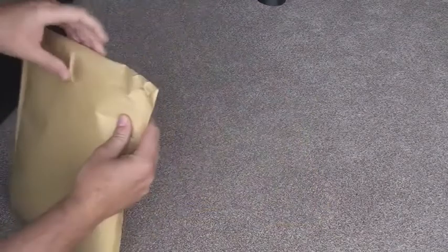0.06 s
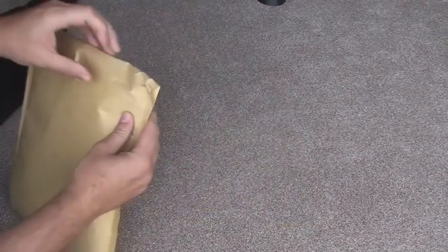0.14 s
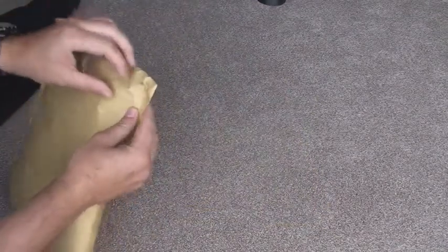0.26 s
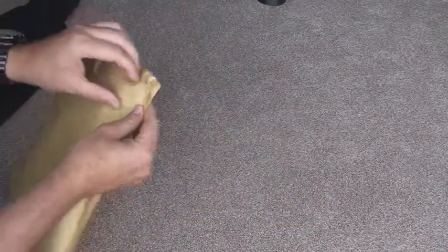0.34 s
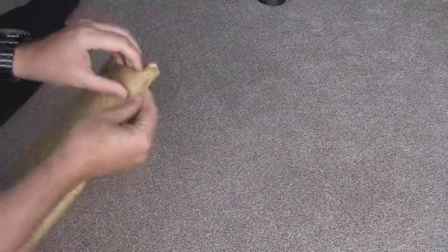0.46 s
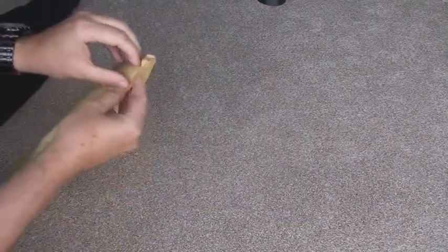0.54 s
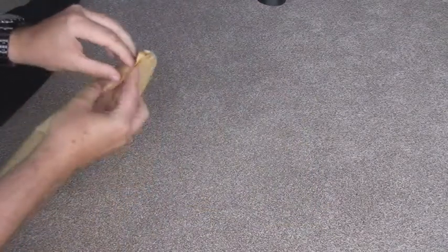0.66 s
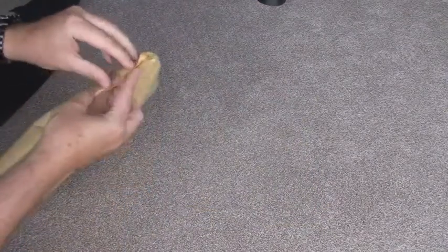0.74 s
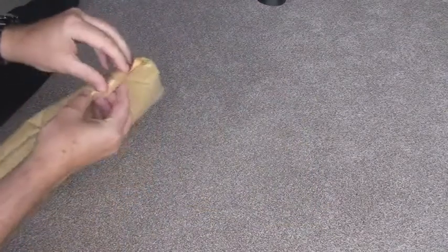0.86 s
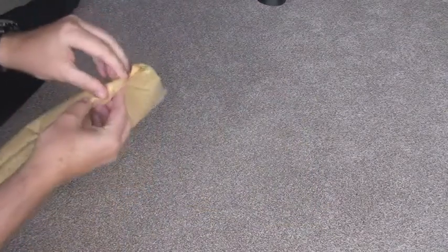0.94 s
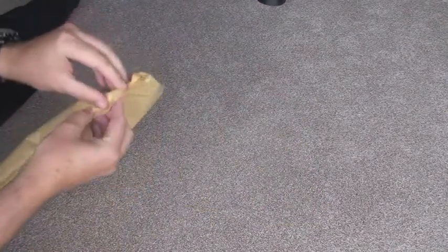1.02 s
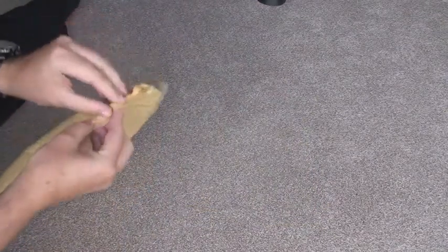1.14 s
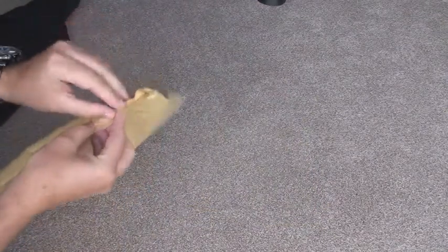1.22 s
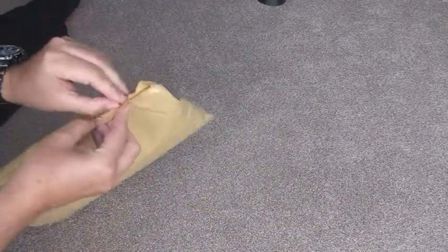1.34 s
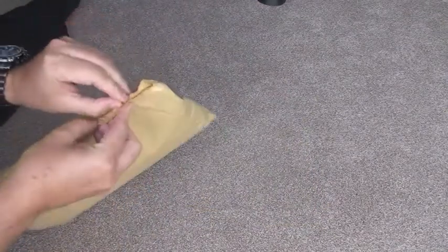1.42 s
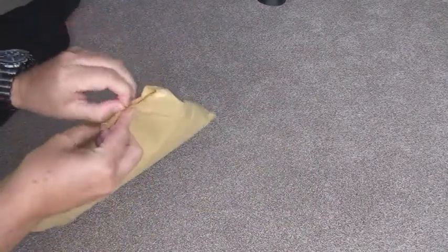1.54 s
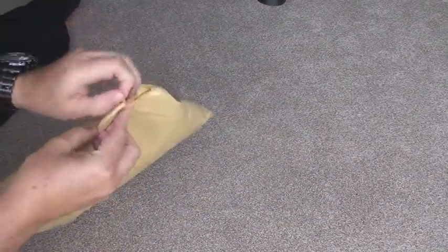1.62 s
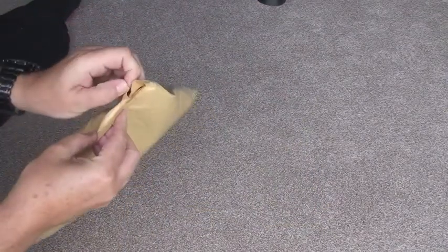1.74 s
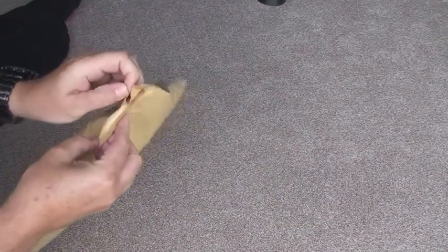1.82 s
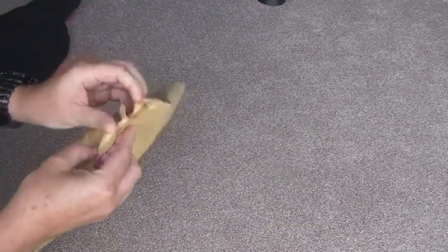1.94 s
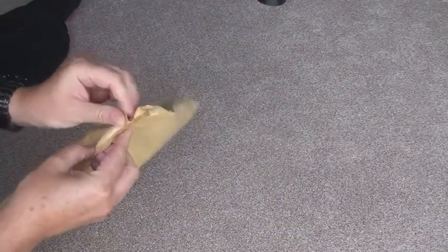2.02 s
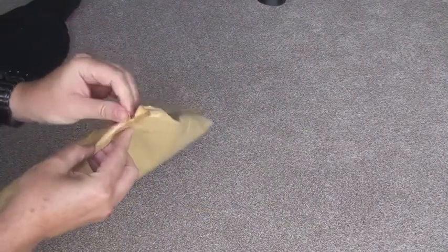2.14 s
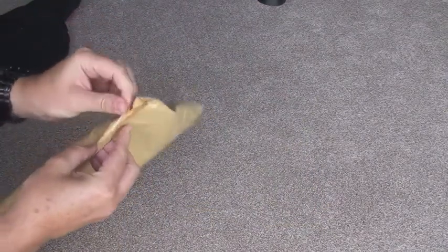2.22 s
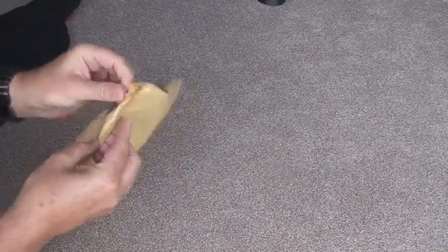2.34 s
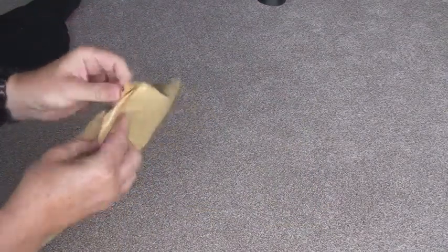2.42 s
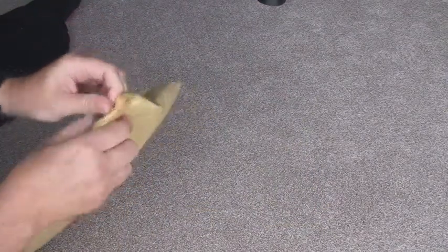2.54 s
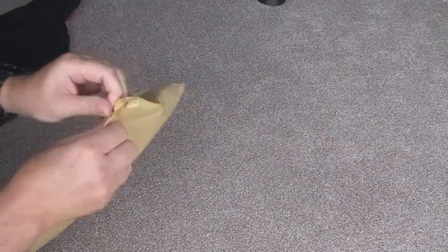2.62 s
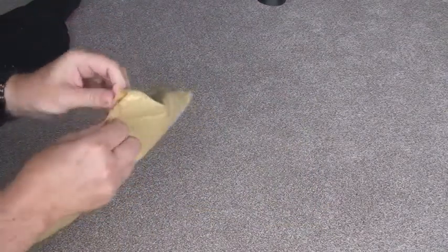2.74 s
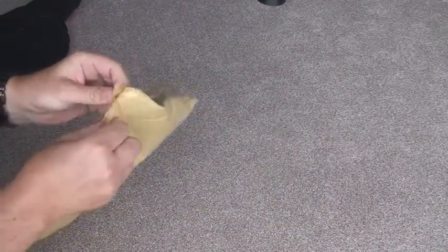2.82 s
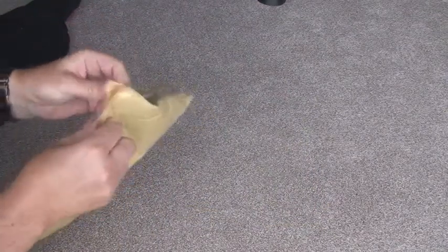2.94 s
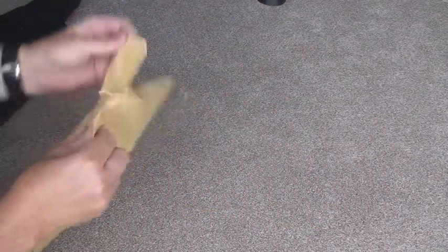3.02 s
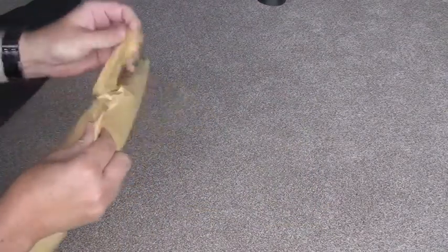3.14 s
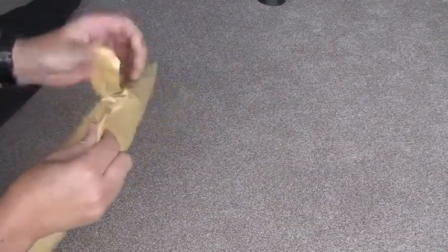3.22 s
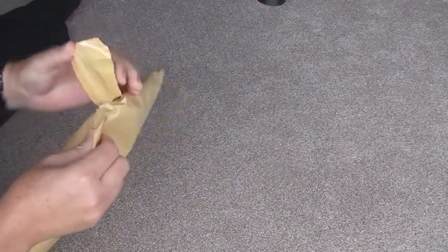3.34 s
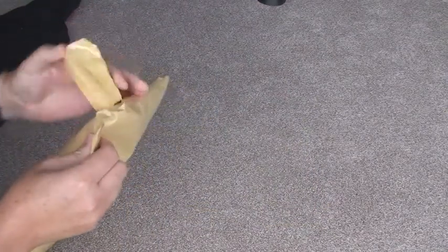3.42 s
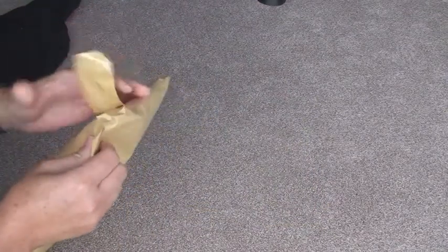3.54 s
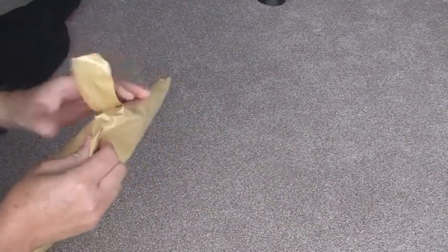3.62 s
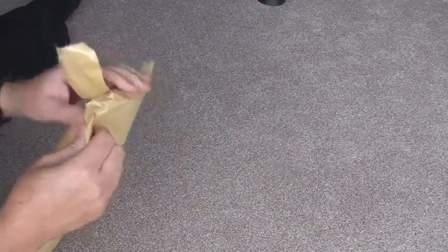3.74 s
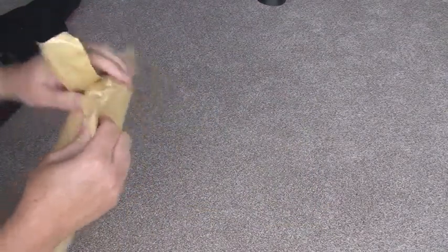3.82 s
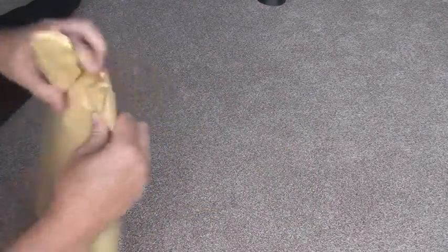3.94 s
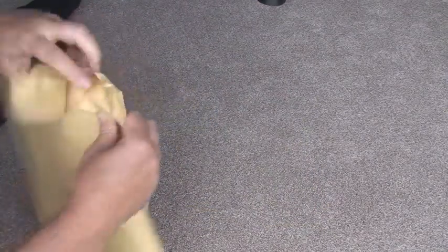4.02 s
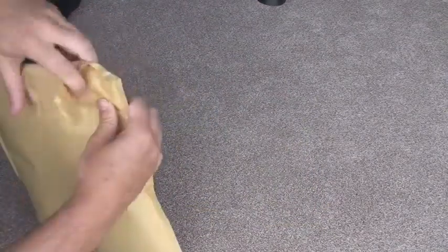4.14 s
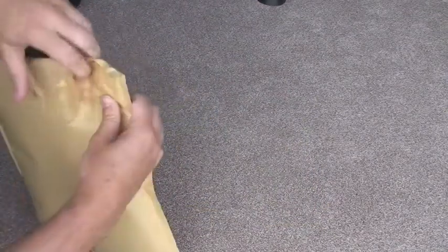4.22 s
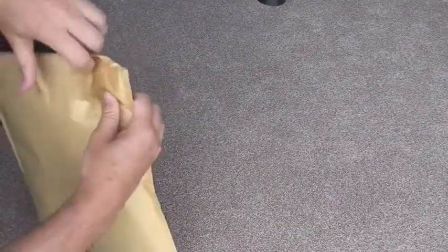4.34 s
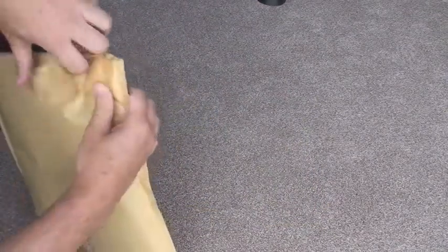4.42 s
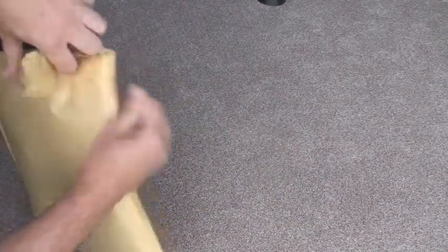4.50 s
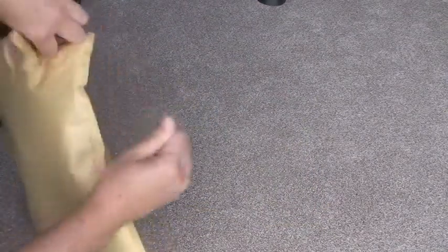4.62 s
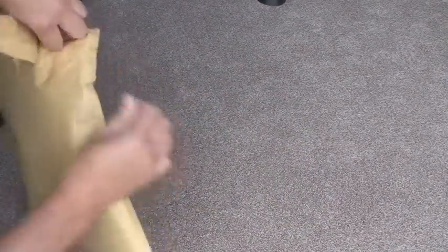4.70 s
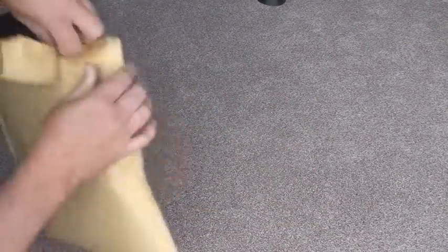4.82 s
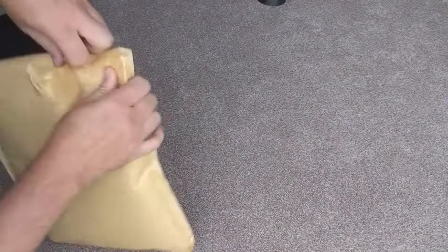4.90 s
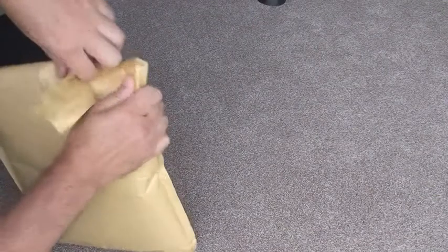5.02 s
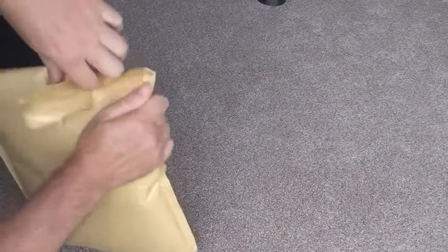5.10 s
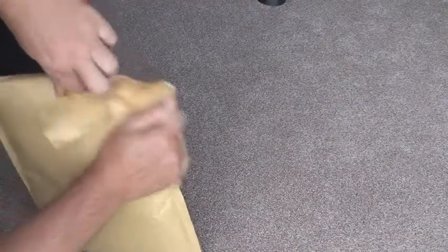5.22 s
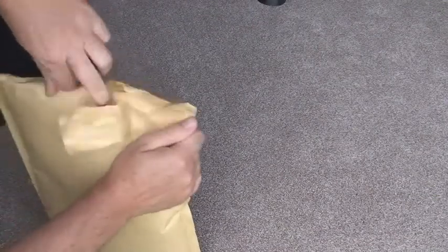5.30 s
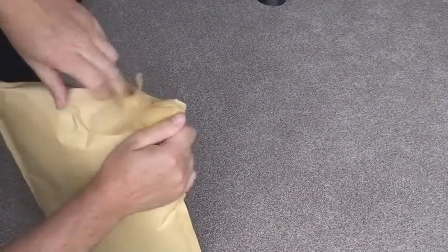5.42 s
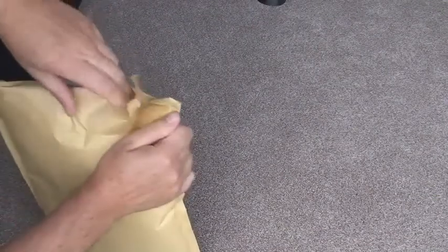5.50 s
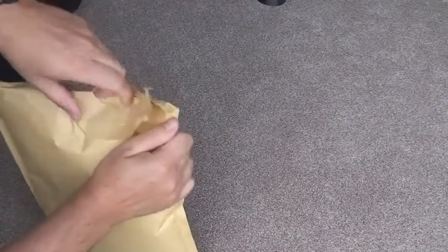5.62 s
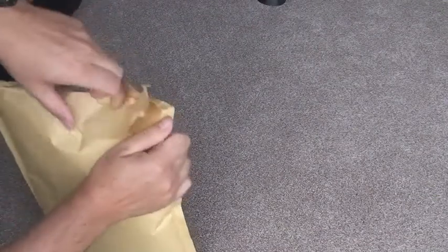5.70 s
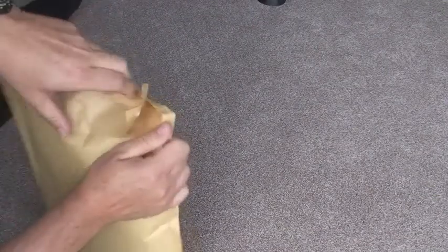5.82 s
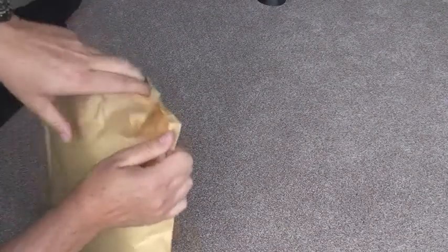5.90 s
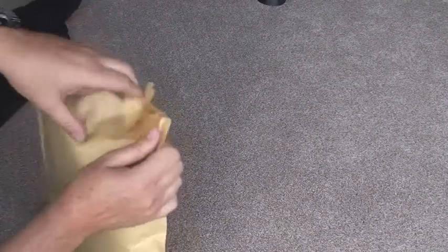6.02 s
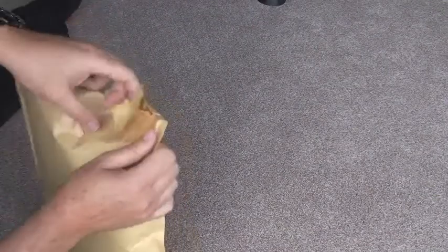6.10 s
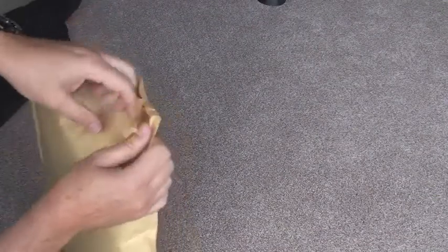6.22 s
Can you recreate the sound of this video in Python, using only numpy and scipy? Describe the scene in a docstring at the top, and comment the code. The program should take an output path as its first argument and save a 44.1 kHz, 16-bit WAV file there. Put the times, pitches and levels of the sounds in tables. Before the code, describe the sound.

Fingers rub and pinch a stiff padded paper envelope, with uneven crinkles and crisp little snaps. It grows quieter and sparser, then a fast bright rip at three seconds and a slower, fitful tear follow. Soft thuds and a hollow pop lead into louder crumpling. Close pickup, nearly mono, slightly left, in a small carpeted room with faint room tone.

```python
"""Tearing open a padded envelope

Two hands pick at the flap of a padded paper envelope, rip a strip off in two pulls and bend the mouth open.
Creases are noise bursts rung through four bands; rubbing and tearing are dense noise grains with set spectra.
Thuds and the hollow bag are damped sines; squeaks and the taut strip are resonated noise.
A small carpeted room answers with decaying noise; the near pickup is almost mono, over a faint room tone."""
import sys
import numpy as np
from scipy import signal
from scipy.fft import rfft, irfft, next_fast_len
from scipy.io import wavfile
from scipy.ndimage import map_coordinates

SR = 44100
rng = np.random.default_rng(int(sys.argv[2]) if len(sys.argv) > 2 else 0)


def file_out(sig):
    """Save sig as 16-bit WAV at sys.argv[1]."""
    # one column per channel
    cols = np.atleast_2d(sig).T
    # limit, then scale
    lim = np.clip(cols, -1, 1)
    pcm = np.round(lim * 32767).astype(np.int16)
    wavfile.write(sys.argv[1], SR, pcm)


N = 276227


def amp(db):
    """Decibels to gain."""
    return 10 ** (np.asarray(db) / 20)


def unit(x):
    """x at rms 1."""
    return x / np.sqrt(np.mean(x ** 2) + 1e-20)


def along(points, hz):
    """(hz, value) points read on a log frequency axis."""
    f, v = np.transpose(points)
    return np.interp(np.log(hz + 1), np.log(f + 1), v)


def gains(rows, fade_s=0.005):
    """One gain per sample for each dB column, fading out beyond the first and last row."""
    s, *columns = np.transpose(rows)
    t = np.arange(N) / SR
    outside_s = np.maximum(s[0] - t, 0) + np.maximum(t - s[-1], 0)
    inside = np.array([amp(np.interp(t, s, column)) for column in columns])
    return inside * np.exp(-outside_s / fade_s)


def filtered(x, response):
    """x times a response of frequency."""
    size = next_fast_len(N + SR // 2)
    spectrum = rfft(x, size) * response(np.fft.rfftfreq(size, 1 / SR))
    return irfft(spectrum, size)[..., :N]


def coloured(x, spectrum):
    """x shaped by a (hz, db) spectrum, at rms 1."""
    return unit(filtered(x, lambda hz: amp(along(spectrum, hz))))


def resonating(x, modes):
    """x through parallel resonances (hz, width_hz, db) of alternating sign, at rms 1."""
    def response(f):
        total = 0
        for k, (centre, width, db) in enumerate(modes):
            damping = 1j * f * width
            total = total + (-1) ** k * amp(db) * damping / (centre * centre - f * f + damping)
        return total
    return unit(filtered(x, response))


def crackle(rate, spread_db, t60, smooth_db):
    """Tiny slips of uneven size, each with its own brief ring, over smooth rubbing noise."""
    count = int(rate * N / SR)
    t = np.arange(SR // 80) / SR
    chance = rng.random((count, 2))
    rings = rng.standard_normal((count, len(t))) * amp(-60 * t / t60)
    # many faint slips, few strong ones
    sizes = amp(spread_db * np.minimum(-np.log(1 - chance[:, 1]), 2.3))
    where = (chance[:, :1] * N).astype(int) + np.arange(len(t))
    grains = np.bincount(where.ravel(), (sizes[:, None] * rings).ravel(), N)[:N]
    return unit(unit(grains) + amp(smooth_db) * rng.standard_normal(N))


def shifting(x, depth_db):
    """The sheet keeps changing shape: a smooth random dB field over time and frequency, at rms 1."""
    z = signal.stft(x, nperseg=512)[2]
    smoother = np.outer(np.hanning(9), np.hanning(19))
    field = unit(signal.convolve(rng.standard_normal(z.shape), smoother, "same"))
    return unit(signal.istft(z * amp(depth_db * field), nperseg=512)[1][:N])


def jerks(rate, depth_db, relax_s, count=2048):
    """Stick and slip: at uneven gaps the paper gives way at once, then the strain relaxes. A gain of rms 1."""
    gaps, sizes = rng.uniform(.25, 1.75, (2, count))
    starts = (np.cumsum(gaps) - gaps[0]) / rate
    t = np.arange(N) / SR
    last = np.searchsorted(starts, t, "right") - 1
    strain = np.exp(-(t - starts[last]) / relax_s)
    return unit(amp(depth_db * sizes[last] * strain))


def wandering(x, octaves, rate, count=512):
    """The pitch of a ringing sheet drifts as its tension changes: x is read at a varying speed."""
    drift = map_coordinates(rng.standard_normal(count), [np.arange(N) * rate / SR], mode="wrap")
    return unit(map_coordinates(x, [np.cumsum(2 ** (octaves * drift))], mode="mirror"))


# noise spectrum of the quiet room: hz, level_db
ROOM_TONE_SPECTRUM = [(20, -39), (45, -20), (72, 6), (100, -24), (200, -13), (500, -2.5), (2000, -41),
                      (12500, -15), (14500, -55)]


def room_tone(level_db=-57.5, own_noise=0.28):
    """Steady coloured noise, mostly common to both channels."""
    noise = rng.standard_normal((2, N)) * own_noise + rng.standard_normal(N)
    return amp(level_db) * coloured(noise, ROOM_TONE_SPECTRUM)


# reverberation time of the room: hz, t60_s
TAIL_T60 = [(100, 0.59), (1000, 0.23), (5000, 0.25), (13000, 0.3)]


def answer(bounce_s=.009, bounce_t60_s=0.02, onset_s=0.00043, bounce_db=-13, tail_db=-6):
    """Mid and side response of the room: a scattered bounce off a near surface, and a diffuse tail."""
    hz, t, z = signal.stft(rng.standard_normal((2, SR // 2)), SR, nperseg=256)
    decay = amp(-60 * t / along(TAIL_T60, hz)[:, None]) * (1 - np.exp(-t / onset_s))
    tail = signal.istft(z * decay, SR, nperseg=256)[1]
    late_s = np.arange(tail.shape[1]) / SR - bounce_s
    bounce = rng.standard_normal(tail.shape) * (late_s > 0) * amp(-60 * np.abs(late_s) / bounce_t60_s)
    tail = amp(tail_db) * tail / np.linalg.norm(tail[0])
    return tail + amp(bounce_db) * bounce / np.linalg.norm(bounce[0])


# gain of the room's side part: hz, gain_db
ROOM_WIDTH = [(150, -15.5), (1000, -9), (5000, -10), (10000, -2), (12000, -12)]


def room(x, size=8192):
    """As the envelope moves, each moment reaches the walls by new paths: a fresh response per block."""
    out = np.zeros((2, N + 2 * SR))
    padded = np.pad(x, (size, 2 * size))
    for start in range(0, N + size, size):
        piece = padded[start:start + 2 * size] * np.hanning(2 * size)
        echo = signal.fftconvolve(piece[None], answer(), axes=1)
        out[:, start:start + echo.shape[1]] += echo
    mid, side = out[:, size:size + N]
    side = filtered(side, lambda hz: amp(along(ROOM_WIDTH, hz)))
    return np.array([mid + side, mid - side])


# a hand presses on the padding: start_s, level_db, pitch_hz
PADDING_THUDS = [(0.032, -31, 163), (3.559, -32.5, 278), (3.6532, -33, 301), (4.567, -29, 190),
                 (4.997, -27, 315), (5.243, -26, 393), (6.125, -36, 125)]


def thuds(rise_s=0.0053):
    """The padding gives way softly and swings for only a few cycles."""
    out = np.zeros(N)
    for s, db, hz in PADDING_THUDS:
        age = np.maximum(np.arange(N) / SR - s, 0)
        swell = (age / rise_s) ** 2 * np.exp(2 * (1 - age / rise_s))
        out += amp(db) * swell * np.sin(2 * np.pi * hz * age)
    return out


# the hollow bag pops or is bumped: start_s, level_db
BAG_KNOCKS = [(3.556, -37), (4.555, -19.5), (4.571, -32), (5.2469, -29)]
# modes of the hollow bag: pitch_hz, level_db (relative to the knock), t60_s
BAG_MODES = [(159, -3, 0.083), (530, -5, 0.025), (660, 8, 0.039), (1075, 7, 0.033), (1480, 9.5, 0.014),
             (2380, 5, 0.014)]


def knocks(scatter_db=1):
    """The air pocket and its padded walls ring with a few damped modes."""
    t = np.arange(SR // 8) / SR
    out = np.zeros(N + len(t))
    for s, db in BAG_KNOCKS:
        for hz, mode_db, t60 in BAG_MODES:
            decay = amp(db + mode_db + rng.normal(0, scatter_db) - 60 * t / t60)
            out[round(s * SR):][:len(t)] += decay * np.sin(2 * np.pi * hz * t)
    # so small a bag radiates no deep bass
    return signal.sosfilt(signal.butter(4, 180, "high", fs=SR, output="sos"), out[:N])


# steady rustle of holding, before handling() trims: time_s, crinkle_db, friction_db
STEADY_GRIP = [(0, -39, -35.5), (0.48, -49, -39), (0.6, -41.5, -40), (1.05, -45.5, -42.5),
               (1.46, -41.5, -47), (1.52, -56, -55), (1.56, -55, -56), (1.72, -44, -40), (1.85, -55.5, -57),
               (1.92, -52, -43.5), (2.35, -43, -46.5), (2.7, -47, -38.5), (2.95, -45.5, -44),
               (3.27, -46.5, -46), (3.52, -46, -48), (3.68, -57, -50.5), (3.75, -48.5, -44),
               (4.02, -46, -40), (4.27, -43.5, -40.5), (4.75, -44.5, -34.5), (5.55, -44.5, -36.5),
               (5.7, -42, -43), (5.94, -41, -33.5), (6.03, -46, -43.5), (6.26, -44.5, -37)]
# single pushes, pinches or slides, before handling() trims:
# full_s (attack done), hold_s, flex_db, crinkle_db, friction_db
FINGER_MOVES = [(0.0, 0.11, -45.5, -34.5, -27), (0.347, 0.035, -42, -34.5, -39),
                (0.697, 0.047, -61, -40, -37.5), (0.829, 0.048, -62, -33, -36),
                (0.901, 0.053, -47, -51, -34.5), (1.116, 0.033, -44, -43, -46), (1.26, 0.16, -53, -47, -51),
                (1.55, 0.12, -43.5, -47.5, -47.5), (1.694, 0.021, -37, -40, -37),
                (2.07, 0.069, -63, -59, -38), (2.15, 0.088, -59, -43, -42), (2.51, 0.058, -51, -44, -37),
                (2.616, 0.064, -53, -34.5, -30), (2.876, 0.03, -37.5, -36.5, -34),
                (3.161, 0.033, -60, -44, -40), (3.513, 0.043, -33, -52, -56), (3.831, 0.07, -44, -42, -45),
                (3.948, 0.06, -59, -36, -34.5), (4.105, 0.091, -43, -51, -37),
                (4.311, 0.26, -47, -40.5, -38), (4.508, 0.13, -49, -40.5, -30.5),
                (4.657, 0.08, -39, -38, -31), (4.913, 0.07, -40, -33, -30), (5.003, 0.081, -37, -31, -29),
                (5.119, 0.041, -36, -25, -24.5), (5.205, 0.066, -56, -52, -28.5),
                (5.295, 0.051, -52, -33, -39), (5.404, 0.049, -33, -31, -31.5),
                (5.597, 0.038, -42, -34.5, -29), (5.751, 0.02, -39.5, -31.5, -51),
                (5.863, 0.066, -39, -35, -53), (6.078, 0.035, -38, -35.5, -39),
                (6.126, 0.024, -42, -34, -26.5), (6.173, 0.027, -37, -38, -31.5)]
MOVE_ATTACK_S, MOVE_RELEASE_S = 0.011, 0.012  # time constants
GRIP_FLEX_DB = -8.5  # relative to the grip's crinkle


def effort():
    """Flex, crinkle and friction gains: the steady grip, and moves that rise, hold and die away."""
    t = np.arange(N) / SR
    crinkle, slide = gains(STEADY_GRIP)
    power = np.array([amp(GRIP_FLEX_DB) * crinkle, crinkle, slide]) ** 2
    for s, hold_s, *levels in FINGER_MOVES:
        rise = np.maximum(s - t, 0) / MOVE_ATTACK_S
        fall = np.clip(t - s - hold_s, 0, 1) / MOVE_RELEASE_S
        power += np.outer(amp(levels), np.exp(-rise - fall)) ** 2
    return np.sqrt(power)


# spectra of bag flexing, paper crinkle and finger friction: hz, level_db
BAG_SPECTRUM = [(30, -46), (70, -21), (110, -3.5), (165, 4), (250, 6), (285, -13), (320, 7.5), (400, -4),
                (550, 2), (1000, -32.5)]
CRINKLE_SPECTRUM = [(200, -53), (450, 0.5), (700, 3), (1050, 6), (1650, 0.5), (2500, -5), (3300, -11),
                    (7000, -65)]
FRICTION_SPECTRUM = [(1200, -3.5), (2500, 7), (3300, 4), (4300, 1.5), (5200, -1), (7500, -0.5),
                     (10000, -11), (11700, -8), (13300, -11.5), (14100, -41), (16000, -49)]
# how firmly skin drags and makes the paper whistle: time_s, level_db (relative to the friction)
SKIN_DRAG = [(0, -10), (.45, -9), (.7, -9), (.95, -12), (1.3, -13), (2.1, -11), (2.5, -7), (2.8, -6),
             (3.1, -10), (3.8, -8), (4.2, -5.5), (4.8, -9.5), (5.3, -13), (5.8, -13), (6.26, -12)]
# whistling bands: pitch_hz, width_hz, level_db
WHISTLE_BANDS = [(5860, 330, 0.5), (6900, 310, 0), (8830, 300, -7.5)]


def handling(flex, crinkle, slide, bag_db=-4.0, crinkle_db=-0.5, friction_db=-1):
    """The bag flexes and crinkles in the grip while fingertips stick and slide over it."""
    folds = shifting(crackle(rate=300, spread_db=10.5, t60=0.024, smooth_db=-0.5), depth_db=1.0)
    skin = shifting(crackle(rate=700, spread_db=7.5, t60=0.0029, smooth_db=-3), depth_db=1)
    # the stiff outer paper ticks more crisply than the padded bag
    ticks = shifting(crackle(rate=450, spread_db=6, t60=0.007, smooth_db=-7), depth_db=2)
    # each whistling band comes and goes as the fingertips shift
    whistle = gains(SKIN_DRAG)[0] * resonating(shifting(rng.standard_normal(N), depth_db=4.5), WHISTLE_BANDS)
    bag = amp(bag_db) * flex * coloured(folds, BAG_SPECTRUM)
    paper = amp(crinkle_db) * crinkle * coloured(ticks, CRINKLE_SPECTRUM)
    rub = coloured(skin + 0.59 * folds, FRICTION_SPECTRUM) + whistle
    catches = jerks(rate=55, depth_db=4, relax_s=.004)
    return catches * (bag + paper + amp(friction_db) * slide * rub)


# a fingertip catches on the paper: start_s, level_db, pitch_hz, t60_s
FINGER_SQUEAKS = [(0.9345, -26, 6950, 0.042), (2.767, -36.5, 6970, 0.11)]


def squeaks(width_hz=150, attack_s=0.0013):
    """Skin sticks and slips so fast that it gives a brief, narrow whistle."""
    out = np.zeros(N)
    for s, db, hz, t60 in FINGER_SQUEAKS:
        age = np.maximum(np.arange(N) / SR - s, 0)
        envelope = amp(db - 60 * age / t60) * (1 - np.exp(-age / attack_s))
        out += envelope * resonating(rng.standard_normal(N), [(hz, width_hz, 0)])
    return out


# the mouth of the bag is squeezed: time_s, level_db
MOUTH_SQUEEZE = [(3.82, -50), (3.838, -29), (3.88, -38), (3.91, -35), (3.935, -30), (3.955, -22),
                 (3.975, -37), (3.995, -48)]
# resonances of the double fold: pitch_hz, width_hz, level_db
FOLD_MODES = [(1040, 310, -3.5), (1500, 300, -0.5), (1910, 380, -5.5)]


def squeeze():
    """Crowded slips of nearly even size ring the double fold, whose pitch shifts as it bends."""
    slips = crackle(rate=900, spread_db=2, t60=.002, smooth_db=-6)
    ring = wandering(resonating(slips, FOLD_MODES), octaves=.13, rate=50)
    return gains(MOUTH_SQUEEZE)[0] * jerks(rate=100, depth_db=6, relax_s=.004) * ring


# registers of a snap (thump, panel, crack, fizz): low_hz, high_hz, shortest_t60_s, level_db
SNAP_REGISTERS = [(219, 693, 0.019, -12.5), (653, 1880, 0.0095, -2.5), (2130, 4670, 0.0054, -1),
                  (5650, 12300, 0.0014, -6.5)]
TILT_PIVOT_HZ = 2000
FOCUS_DB, FOCUS_OCTAVES = 5, 0.77  # a snap is strongest about the pitch of its facet


def snaps(creases, kick=1.87, level_db=-1.5, soft_hz=10500, facet_q=4, facet_db=2, stretch=1.36):
    """A crease flips with a sharp kick and a short shudder; lower registers of the bag ring longer."""
    t = np.arange(SR // 16) / SR
    out = np.zeros(N + len(t))
    bands = [signal.butter(3, [lo, min(hi, SR / 2 - 1)], "band", fs=SR, output="sos")
             for lo, hi, _, _ in SNAP_REGISTERS]
    soften = signal.butter(1, min(soft_hz, SR / 3), fs=SR)  # limp paper damps the top of the crack
    span = .005 * SR  # a level is the ring's energy spread over 5 ms
    for s, db, tilt_db, facet_hz, t60 in creases:
        shudder = rng.standard_normal(len(t))
        shudder[0] = kick * rng.choice([-1, 1])
        shudder = signal.lfilter(*soften, shudder)
        # the facet beside each crease has its own size, hence its own pitch
        facet = signal.iirpeak(min(facet_hz, SR / 4), facet_q, fs=SR)
        for band, (lo, hi, shortest, register_db) in zip(bands, SNAP_REGISTERS):
            push = shudder * amp(-60 * t / np.hypot(stretch * t60, shortest))
            ring = signal.sosfilt(band, push + amp(facet_db) * signal.lfilter(*facet, push))
            # a tight crease favours the high registers, a broad one the low
            centre = np.sqrt(lo * hi)
            near_facet = np.exp(-(np.log2(centre / facet_hz) / FOCUS_OCTAVES) ** 2)
            colour_db = register_db + tilt_db * np.log2(centre / TILT_PIVOT_HZ) + FOCUS_DB * near_facet
            level = amp(db + colour_db + level_db) * np.sqrt(span) / np.linalg.norm(ring)
            out[round(s * SR):][:len(t)] += level * ring
    return out[:N]


# a fingernail skips along the glued edge: start_s, length_s, ticks_per_s, level_db (before snaps() trim)
NAIL_SKIPS = [(2.247, 0.085, 112, -44.5), (2.438, 0.057, 98, -43.5)]
SKIP_TILT_DB_PER_OCTAVE, SKIP_HZ = -4.5, 1290
SKIP_RING_S = 0.0039  # before snaps() stretch


def skips(scatter_db=1.5, scatter_octaves=0.45, count=24):
    """Nearly even ticks of a catching nail, played as short creases."""
    ticks = []
    for s, length_s, rate, db in NAIL_SKIPS:
        late, size, pitch = rng.standard_normal((3, count))
        ages = (np.arange(count) + .12 * late) / rate
        for age, a, b in zip(ages, size, pitch):
            if age < length_s:
                hz = SKIP_HZ * 2 ** (scatter_octaves * b)
                ticks.append((s + age, db + scatter_db * a, SKIP_TILT_DB_PER_OCTAVE, hz, SKIP_RING_S))
    return snaps(ticks)


SMALL_PER_S, SMALL_SPREAD_DB = 48, 3
SMALL_DB, SMALL_MAX_DB = 0, -36  # over the crinkle gain; ceiling; both before snaps() trim
SMALL_TILT_DB_PER_OCTAVE, SMALL_TILT_SPREAD_DB = -2.5, 2
SMALL_HZ, SMALL_PITCH_OCTAVES = 1420, 0.84  # facet pitch, scatter
SMALL_RING_S = 0.019  # before snaps() stretch


def small_snaps(crinkle, count=512):
    """Faint creases give way at uneven gaps, as loud as the crinkling; small size limits their level."""
    gaps = rng.uniform(.1, 1.9, count)
    chance = np.clip(rng.standard_normal((count, 4)), -2, 2)
    creases = []
    for s, (size, bright, pitch, ring) in zip(np.cumsum(gaps) / SMALL_PER_S, chance):
        if s < (N - 1) / SR:
            db = 20 * np.log10(crinkle[int(s * SR)]) + SMALL_DB + SMALL_SPREAD_DB * size
            tilt_db = SMALL_TILT_DB_PER_OCTAVE + SMALL_TILT_SPREAD_DB * bright
            hz = SMALL_HZ * 2 ** (SMALL_PITCH_OCTAVES * pitch)
            creases.append((s, min(db, SMALL_MAX_DB), tilt_db, hz, SMALL_RING_S * np.exp(0.18 * ring)))
    return snaps(creases)


# single creases that buckle, faint to loud: start_s, level_db (before snaps() trim), tilt_db_per_octave,
# facet_hz, ring_s (t60 before snaps() stretch)
SINGLE_CREASES = [(0.1735, -37.5, 1, 3540, 0.011), (0.3132, -35, -4, 1500, 0.009),
                  (0.3315, -20, 1.5, 4630, 0.0053), (0.3605, -30, 3, 3530, 0.01),
                  (0.369, -30, -2, 776, 0.009), (0.5269, -32, -1, 1590, 0.022),
                  (0.549, -36.5, -1, 1200, 0.016), (0.6228, -29.5, 0, 3230, 0.0088),
                  (0.6838, -23, 0, 3560, 0.012), (0.6925, -37, 0, 3970, 0.006),
                  (0.7031, -26.5, -1, 1040, 0.0089), (0.7173, -28, -4, 600, 0.0074),
                  (0.7875, -29.5, -3, 786, 0.015), (0.8095, -28, -4, 1000, 0.01),
                  (0.8315, -20.5, -3, 1600, 0.013), (0.8415, -32, -3.5, 1500, 0.013),
                  (0.8612, -26.5, -2, 2700, 0.013), (0.8695, -27.5, 0, 1610, 0.017),
                  (0.8912, -28.5, 1, 1720, 0.018), (0.967, -33, -0.5, 907, 0.023),
                  (1.0051, -36, -3.5, 1080, 0.014), (1.1125, -31, -3, 1260, 0.016),
                  (1.1178, -28.5, 1, 1260, 0.01), (1.1443, -30, -1.5, 1620, 0.023),
                  (1.2352, -41, 5, 4000, 0.011), (1.274, -40, -3, 1800, 0.0096),
                  (1.3283, -36, -3, 1660, 0.0091), (1.3582, -41, -3, 1700, 0.009),
                  (1.4058, -36.5, -6, 1100, 0.01), (1.4643, -40.5, -8, 623, 0.0069),
                  (1.4825, -41.5, 1, 1300, 0.01), (1.5349, -33.5, -2.5, 674, 0.032),
                  (1.5646, -33.5, -4, 696, 0.011), (1.5998, -30.5, -2.5, 2060, 0.011),
                  (1.6621, -44, -7, 895, 0.021), (1.6679, -26.5, -2.5, 2190, 0.0087),
                  (1.6911, -32, -7, 800, 0.01), (1.704, -36, 5, 9100, 0.011),
                  (1.7085, -30.5, 2, 7000, 0.0068), (1.7235, -36, 0, 1500, 0.008),
                  (1.7469, -28.5, -0.5, 1470, 0.033), (1.9102, -28, -1.5, 1450, 0.0081),
                  (1.9564, -34.5, 0, 2010, 0.0095), (2.0316, -36, 1.5, 980, 0.01),
                  (2.0541, -34.5, 2, 2950, 0.016), (2.0667, -35, 5.5, 4570, 0.0077),
                  (2.074, -25.5, 0.5, 7300, 0.018), (2.1071, -27.5, 3, 6200, 0.0098),
                  (2.16, -26.5, -4, 890, 0.0089), (2.179, -26.5, -5.5, 840, 0.023),
                  (2.2063, -34, -3, 1200, 0.008), (2.2229, -27, -1, 860, 0.018),
                  (2.2762, -37.5, -1, 1300, 0.006), (2.2842, -37.5, -2.5, 1200, 0.006),
                  (2.3361, -35, -6.5, 1040, 0.0058), (2.378, -30.5, 1.5, 6200, 0.013),
                  (2.4319, -33, -1.5, 1510, 0.012), (2.4839, -33, -1.5, 1050, 0.018),
                  (2.5003, -33, -4.5, 1040, 0.017), (2.5296, -31.5, 1.5, 5500, 0.0087),
                  (2.5865, -28.5, 0, 1580, 0.016), (2.61, -31, -4.5, 1540, 0.014),
                  (2.6245, -28, -2.5, 1610, 0.011), (2.6398, -19.5, -2, 2900, 0.037),
                  (2.6968, -29.5, -1, 6900, 0.0065), (2.7052, -32, -3, 3200, 0.0082),
                  (2.8723, -24.5, 1.5, 905, 0.0061), (2.9698, -30, -3.5, 680, 0.019),
                  (2.9978, -20.5, -1, 10000, 0.025), (3.0195, -23.5, -4, 990, 0.0065),
                  (3.024, -19.5, 1.5, 4220, 0.0073), (3.031, -24, -6, 3930, 0.005),
                  (3.0463, -25, 3, 3600, 0.004), (3.0875, -28, -5, 2800, 0.007),
                  (3.119, -22, -3.5, 1690, 0.0039), (3.1765, -35, -5, 3200, 0.014),
                  (3.1895, -41, -2, 1400, 0.011), (3.23, -42, -6, 1300, 0.016),
                  (3.3225, -31.5, -1.5, 2290, 0.0092), (3.3384, -29.5, 0, 2310, 0.011),
                  (3.3474, -30, 3.5, 8850, 0.028), (3.3764, -23, -1.5, 1620, 0.025),
                  (3.3968, -30, 4, 7830, 0.031), (3.4205, -25, -1, 4530, 0.019),
                  (3.4335, -25, 2.5, 7000, 0.0079), (3.468, -32, 3, 10000, 0.016),
                  (3.5023, -36.5, 6, 2200, 0.011), (3.51, -23, -4, 2300, 0.011),
                  (3.5435, -20.5, -1.5, 10300, 0.013), (3.5543, -29.5, -5.5, 980, 0.008),
                  (3.6545, -42, -8.5, 620, 0.012), (3.726, -36.5, 2, 960, 0.032),
                  (3.7804, -37.5, -6, 1040, 0.012), (3.835, -28.5, 0.5, 4270, 0.0039),
                  (3.8398, -20.5, 1, 4630, 0.007), (3.8483, -33, 3.5, 5840, 0.0069),
                  (3.8518, -34, 5.5, 5000, 0.004), (3.864, -20.5, 2, 1590, 0.0067),
                  (3.8715, -37, 4, 8000, 0.018), (3.8795, -28, -5, 1200, 0.01),
                  (3.9516, -22.5, -2.5, 1520, 0.013), (3.9605, -25, -3, 2000, 0.013),
                  (3.9685, -36, -1, 4500, 0.006), (3.9755, -24.5, 1, 1500, 0.0078),
                  (4.0153, -36, 0.5, 3300, 0.0079), (4.0948, -21.5, 0, 740, 0.017),
                  (4.1582, -33.5, 3.5, 7160, 0.014), (4.2017, -35.5, 5, 1700, 0.014),
                  (4.2324, -37, 1.5, 2000, 0.012), (4.3178, -28.5, -3, 2150, 0.017),
                  (4.3297, -34, -1, 1400, 0.0087), (4.4254, -26, 1.5, 1030, 0.0089),
                  (4.49, -24.5, -0.7, 7760, 0.0058), (4.5113, -23, 1, 2640, 0.013),
                  (4.5221, -23.5, 1.5, 6100, 0.0086), (4.5548, -21, -3.5, 1440, 0.0058),
                  (4.5855, -28, 1, 4700, 0.007), (4.61, -31, -1, 4200, 0.0067),
                  (4.7135, -31, -1, 3000, 0.024), (4.8371, -36, 2, 2000, 0.016),
                  (4.912, -23.5, -2.5, 3900, 0.021), (4.9306, -22, -3.5, 1100, 0.016),
                  (4.935, -26, -4, 1500, 0.01), (4.955, -25, -3.5, 1040, 0.011),
                  (4.998, -24.5, -2.5, 380, 0.011), (5.0454, -25, -2.5, 972, 0.016),
                  (5.0644, -23, 1.5, 2030, 0.0081), (5.0719, -29, -3, 1500, 0.014),
                  (5.1265, -16.5, 1, 1410, 0.0059), (5.1337, -23.5, -2, 3220, 0.007),
                  (5.1567, -23.5, 0.5, 1040, 0.012), (5.1822, -25.5, -0.5, 3340, 0.01),
                  (5.2035, -28, 6.5, 4200, 0.0068), (5.2057, -13.5, 0.3, 4430, 0.027),
                  (5.2459, -22.5, -6.5, 1080, 0.0062), (5.2769, -34.5, 7.5, 8700, 0.006),
                  (5.2968, -18, 2, 8500, 0.011), (5.4054, -18.5, 1.5, 4750, 0.0098),
                  (5.4365, -21.5, 3, 7600, 0.0035), (5.5355, -29.5, 1.5, 5100, 0.051),
                  (5.6214, -24.5, 4, 3940, 0.0055), (5.7606, -32.5, 3.5, 990, 0.02),
                  (5.8198, -37, 3, 3300, 0.0091), (5.8603, -23.5, -0.5, 4550, 0.0054),
                  (5.8838, -18.5, 0, 2190, 0.0027), (5.8924, -26.5, -0.5, 1110, 0.027),
                  (5.9199, -27.5, -5, 980, 0.0069), (6.0697, -30.5, -1, 1080, 0.012),
                  (6.084, -29.5, -1, 1060, 0.0099), (6.121, -29, 0, 4500, 0.016),
                  (6.1272, -18, -1.5, 1310, 0.01), (6.1485, -26.5, 0.5, 1700, 0.0097),
                  (6.189, -28.5, -2, 1010, 0.013)]


def single_snaps():
    """Single creases buckle, faint to loud, each with its own level, brightness and facet pitch."""
    return snaps(SINGLE_CREASES)


# spectrum of breaking fibres, for both rips: hz, level_db
FIBRE_SPECTRUM = [(1200, -20), (2600, -36), (3600, -9), (4350, 1), (4900, -7), (5500, -0.5), (7000, -1),
                  (8200, -5.5), (9400, -6.5), (10800, -9.5), (11800, -3.5), (13400, -17), (14300, -14),
                  (16000, -31)]
# slow pull that frees the strip, before slow_rip() trims: time_s, strip_db, fibre_db
SLOW_PULL_LEVELS = [(3.318, -42, -41), (3.336, -38, -44), (3.35, -27, -32), (3.368, -39, -36),
                    (3.39, -40, -34), (3.40, -24, -31), (3.415, -36, -28), (3.423, -32, -23),
                    (3.436, -28.5, -27), (3.452, -33.5, -39), (3.48, -33, -32), (3.495, -46, -48)]
# resonances of the taut strip: pitch_hz, width_hz, level_db
STRIP_MODES = [(342, 240, -9), (970, 310, -11), (1570, 180, -3), (2270, 150, 3)]


def slow_rip(strip_db=1.5, fibre_db=0.5):
    """Sparser, more uneven breaks come in fits and ring the narrow strip that is held taut."""
    strip, fibre = gains(SLOW_PULL_LEVELS)
    advance = jerks(rate=90, depth_db=7, relax_s=.005)
    breaks = advance * shifting(crackle(rate=1700, spread_db=5.5, t60=0.002, smooth_db=-11), depth_db=0.5)
    ring = wandering(resonating(breaks, STRIP_MODES), octaves=.025, rate=40)
    return amp(strip_db) * strip * ring + amp(fibre_db) * fibre * coloured(breaks, FIBRE_SPECTRUM)


# fast pull that opens the flap, before fast_rip() trims: time_s, sheet_db, fibre_db
FAST_PULL_LEVELS = [(2.964, -50, -44), (2.972, -36.5, -34), (3.015, -26.5, -21.5), (3.028, -20, -19),
                    (3.06, -19.5, -19.5), (3.10, -28, -26), (3.135, -37, -43), (3.19, -46, -61)]
# spectrum of the shaken sheet: hz, level_db
SHEET_SPECTRUM = [(40, -33), (110, -10), (170, -7), (230, 2), (550, -8.5), (1050, 1.5), (1600, 3.5),
                  (2700, -0.5), (4000, -5), (8000, -43)]


def fast_rip(sheet_db=2.5, fibre_db=-0.9):
    """The tear runs in quick jerks; thousands of fibres break each second and shake the whole sheet."""
    sheet, fibre = gains(FAST_PULL_LEVELS)
    advance = jerks(rate=110, depth_db=5, relax_s=.006)
    breaks = advance * shifting(crackle(rate=2600, spread_db=3, t60=0.0019, smooth_db=-5), depth_db=2.4)
    shaken = amp(sheet_db) * sheet * coloured(breaks, SHEET_SPECTRUM)
    return shaken + amp(fibre_db) * fibre * coloured(breaks, FIBRE_SPECTRUM)


# stereo balance: hz, left_minus_right_db
LEFT_BALANCE = [(100, 0), (270, 1), (450, 1.5), (1100, 3), (3300, 1.4), (5500, 1), (9000, 1.5), (13000, 0)]


def balanced(x):
    """Half of the level difference raises the left channel, half lowers the right."""
    return filtered(x, lambda hz: amp(np.outer([.5, -.5], along(LEFT_BALANCE, hz))))


def scene(lowest_hz=65):
    """The envelope, a little to the left, in the quiet room."""
    flex, crinkle, slide = effort()
    paper = thuds() + knocks() + handling(flex, crinkle, slide) + squeaks() + squeeze()
    paper = paper + skips() + small_snaps(crinkle) + single_snaps() + slow_rip() + fast_rip()
    # air slips round a thin sheet, which cancels its lowest notes
    paper = signal.sosfilt(signal.butter(2, lowest_hz, "high", fs=SR, output="sos"), paper)
    return balanced(paper + room(paper)) + room_tone()


def record(dry, ceiling=.95, top_hz=16200):
    """The recorder rounds off the highest peaks and keeps nothing above its band limit."""
    held = dry / (1 + np.abs(dry / ceiling) ** 6) ** (1 / 6)
    return filtered(held, lambda hz: hz < top_hz)


dry = scene()
out = record(dry)
file_out(out)
```